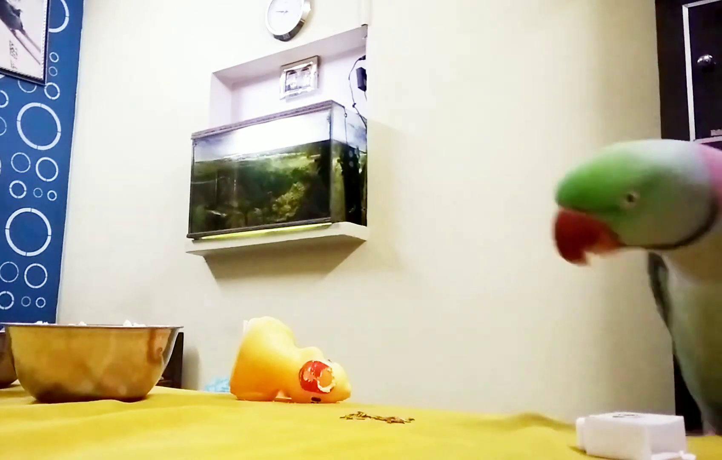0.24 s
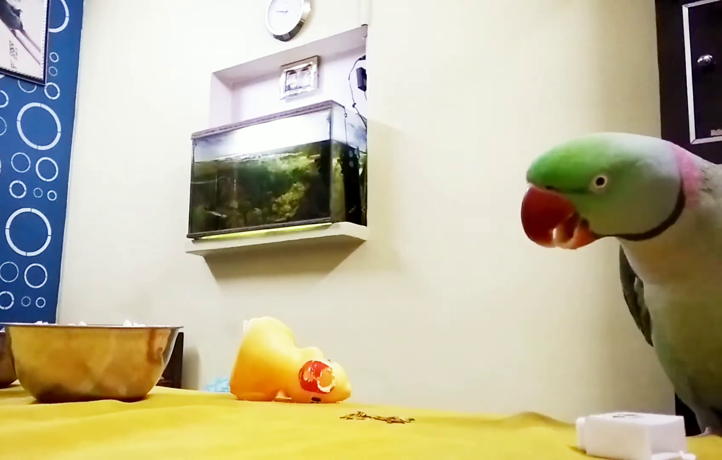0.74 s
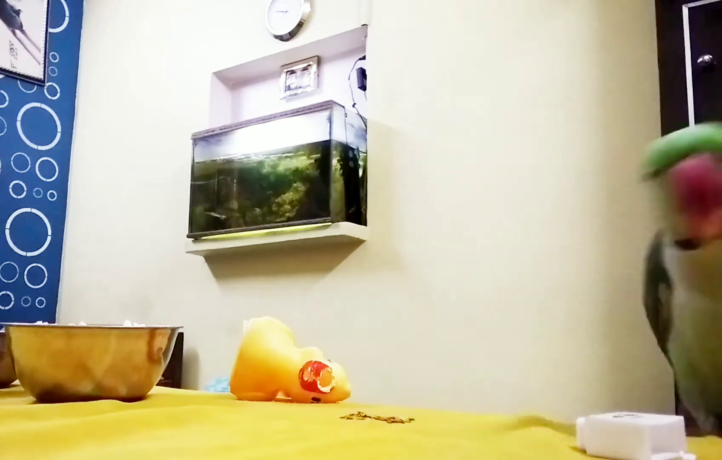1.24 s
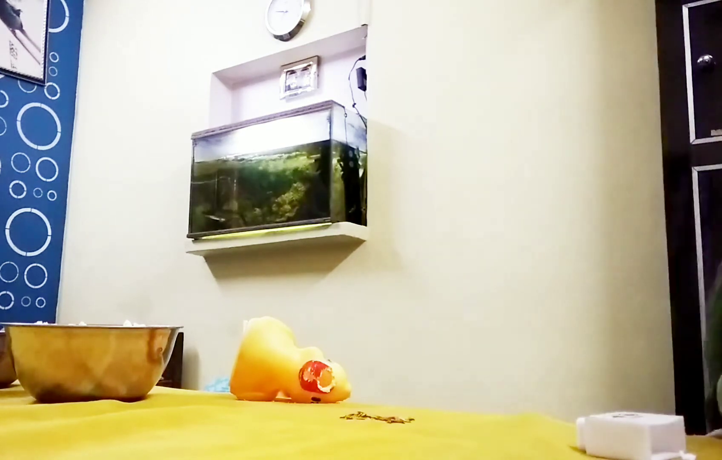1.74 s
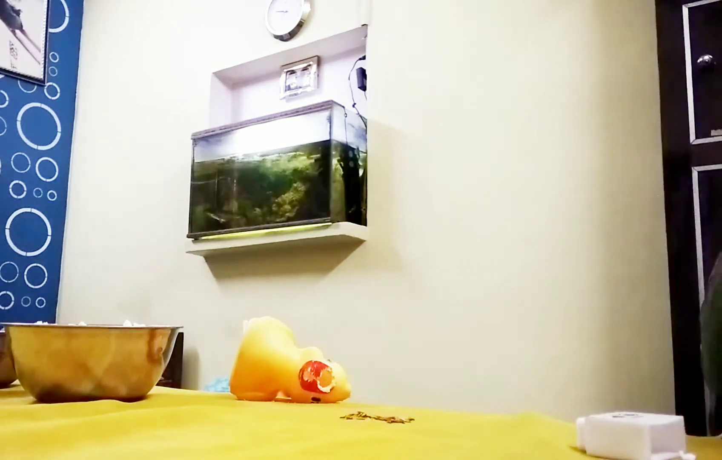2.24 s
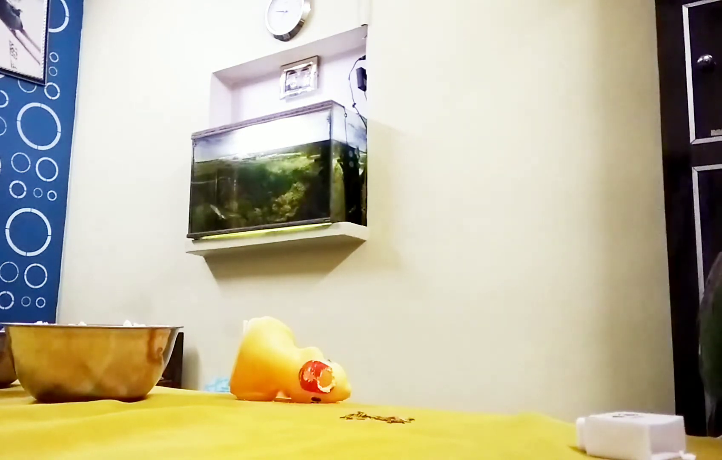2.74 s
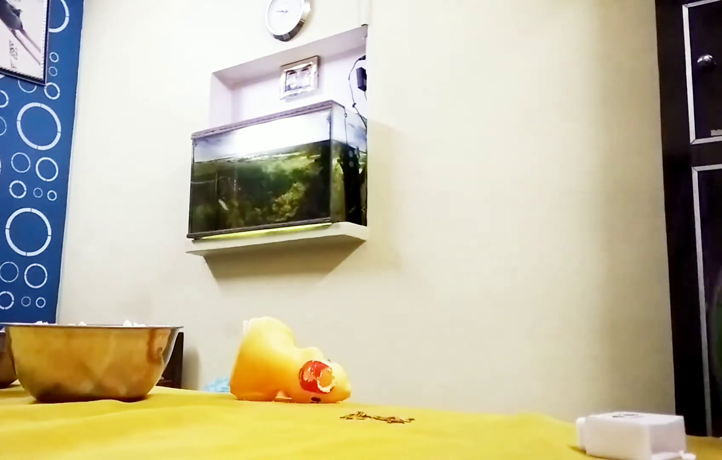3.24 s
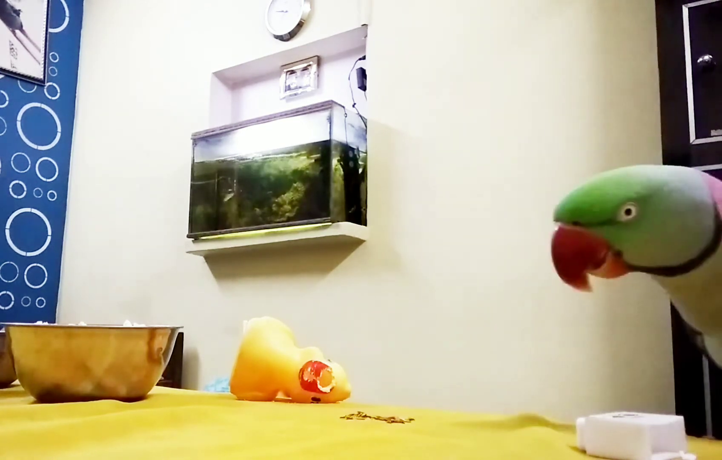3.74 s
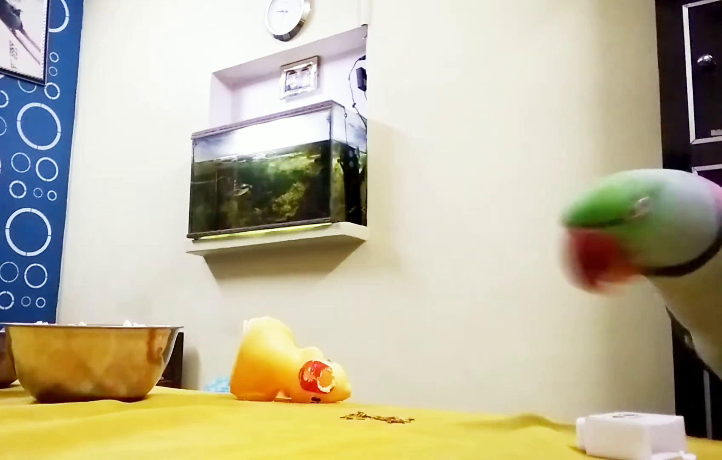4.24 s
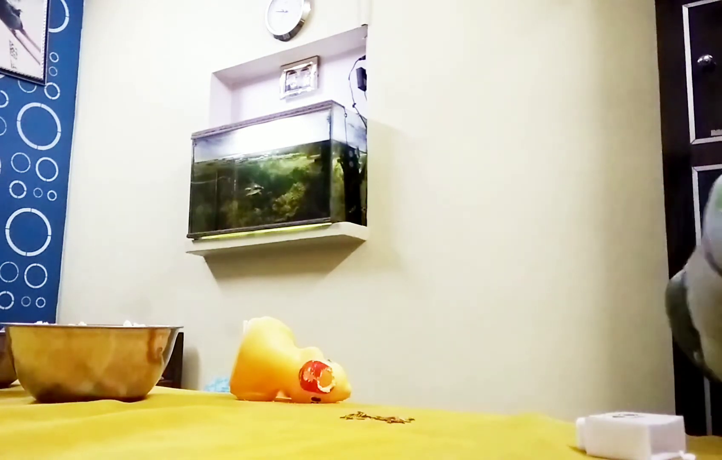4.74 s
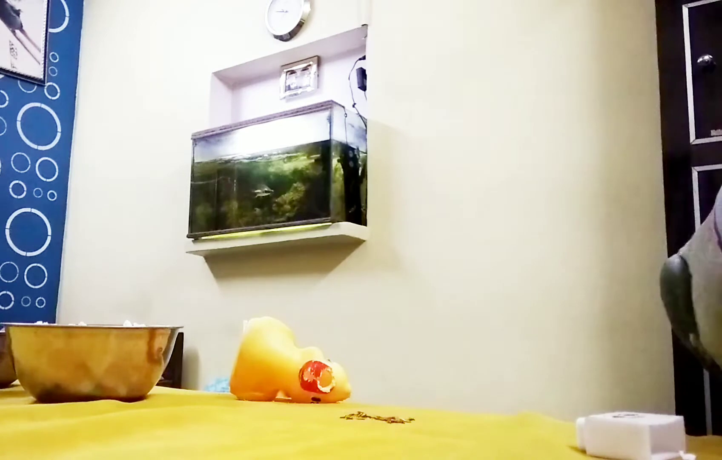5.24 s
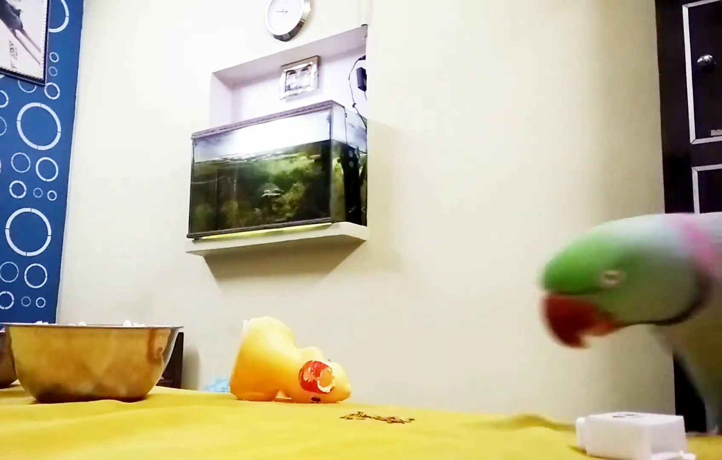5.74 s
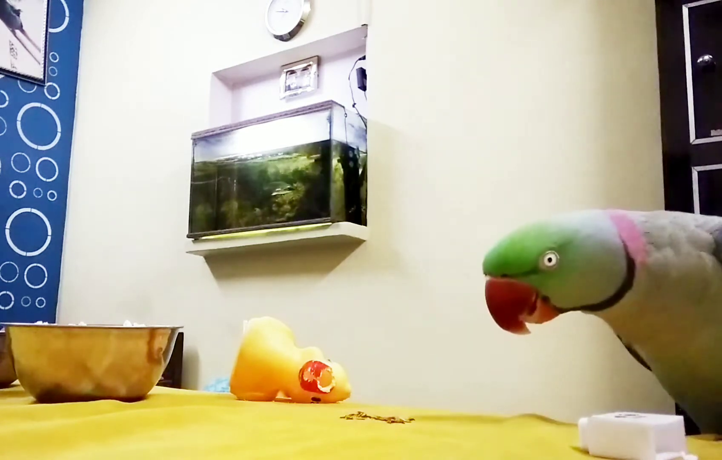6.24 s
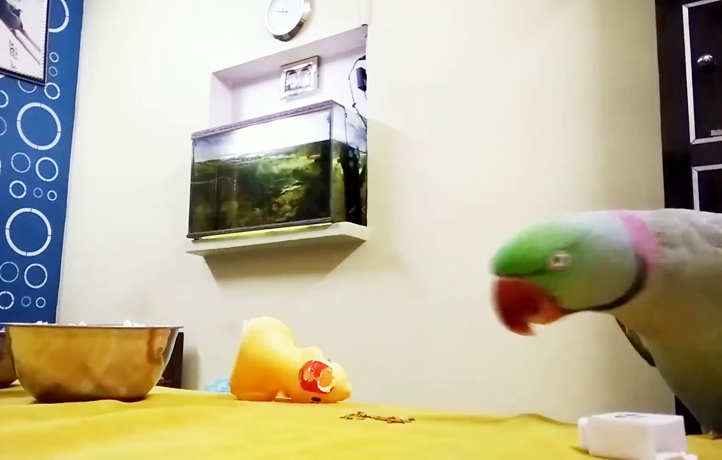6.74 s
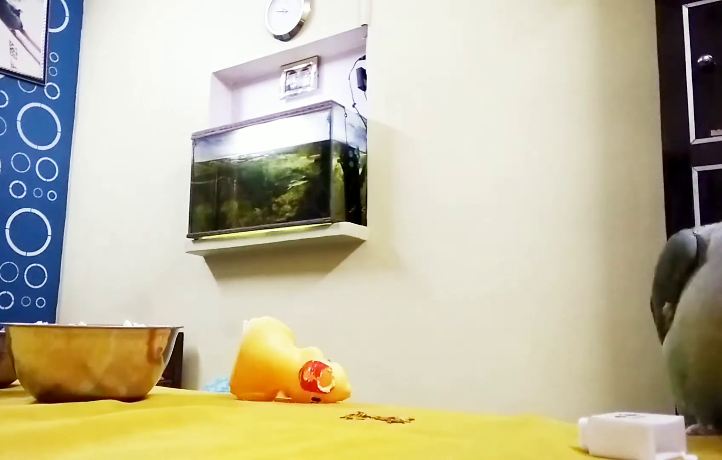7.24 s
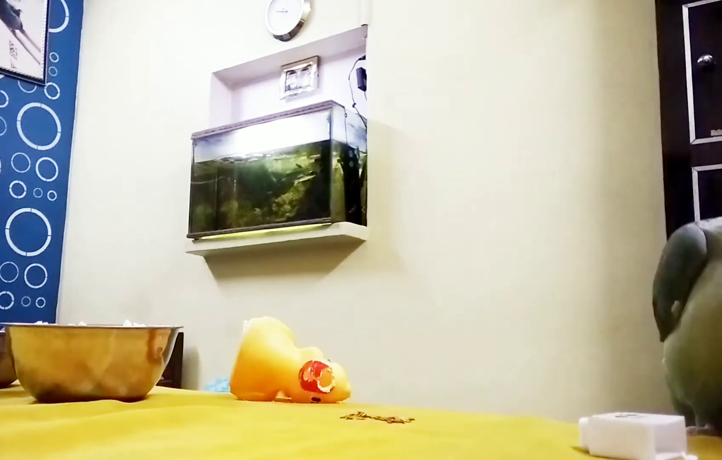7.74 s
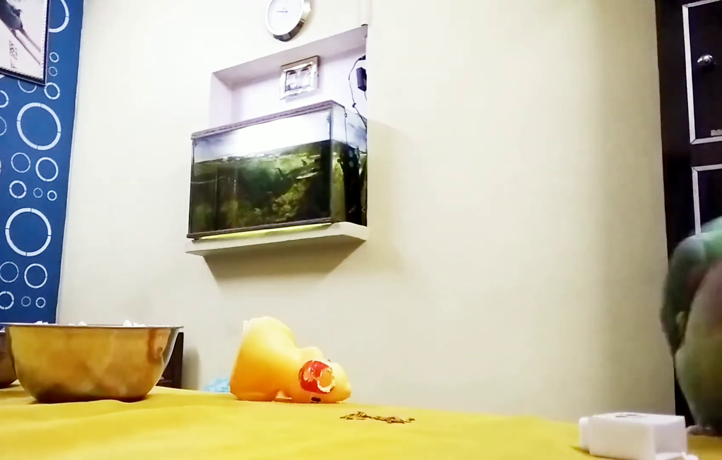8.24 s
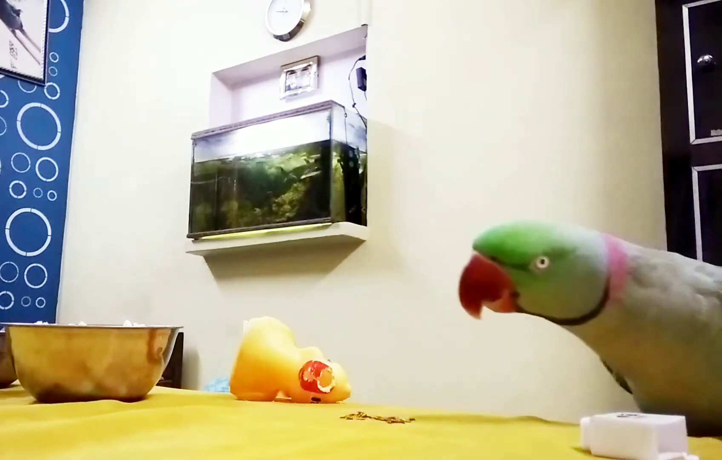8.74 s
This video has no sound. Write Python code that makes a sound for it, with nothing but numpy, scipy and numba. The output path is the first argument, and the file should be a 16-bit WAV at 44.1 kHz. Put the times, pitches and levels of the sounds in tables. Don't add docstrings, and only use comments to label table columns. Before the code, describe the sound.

Indoors, over faint hum and hiss, a pet parakeet chirps three times, each a quick bright rise snapping into a lower falling note, with a short dense room echo. Between the first two, a faint creaky voice slides slowly upward and cracks. Later come a small scratchy squawk and a strong pure whistle sweeping up. Dull footfalls and crisp beak or claw taps sound close to the stereo phone microphones.

```python
import sys
import numpy as np
from scipy import signal
from scipy.fft import rfft, irfft
from scipy.io import wavfile
from scipy.ndimage import uniform_filter1d, minimum_filter1d, map_coordinates
from numba import njit

SR = 44100
rng = np.random.default_rng(int(sys.argv[2]) if len(sys.argv) > 2 else 0)


def voltage_ratio(decibels):
    exponent = np.asarray(decibels, float) / 20
    return 10 ** exponent


def persist_wave(psi):
    counts = np.round(np.clip(psi, -1, 1) * 32767).astype(np.int16)
    wavfile.write(sys.argv[1], SR, np.atleast_2d(counts).T)


N = 396018
T = np.arange(N) / SR
F = np.fft.rfftfreq(N, 1 / SR) + 1
TOP_HZ = 14540


def on_log(table, hz):
    table_hz, values = np.array(table)[:, :2].T
    return np.interp(np.log(hz), np.log(table_hz), values)


def bell(freqs, hz, octaves):
    return np.exp(-.5 * (np.log2(freqs / hz) / octaves) ** 2)


def walk(rate, size):
    k = max(int(SR / rate), 1)
    held = np.repeat(rng.standard_normal(size // k + 1), k)
    return 1.65 * uniform_filter1d(uniform_filter1d(held, k), k)[:size]


def add(out, s, x, lead, pan_db):
    for port, late, db in ((0, 0.0011, pan_db / 2), (1, lead, -pan_db / 2)):
        heard = map_coordinates(x, [np.arange(len(x)) - late], order=3)
        i = int(s * SR)
        out[port, i:i + len(x)] += voltage_ratio(db) * heard[:N - i]


@njit
def follow(x, attack, release):
    e, out = 0., np.empty(len(x))
    for i in range(len(x)):
        e += (x[i] - e) * (attack if x[i] > e else release)
        out[i] = e
    return out


# f/Hz, level/dB per Hz
HUM_COLOUR = [(18, -59.5), (30, -42), (91, -3), (134, -8.5), (170, -2), (277, -11), (419, -6), (557, -8),
              (668, -5.5), (1980, -16.5), (4700, -26), (5000, -33.5), (9100, -26.5), (13100, -49),
              (14500, -44)]
# f/Hz, likeness/0-1
HUM_LIKENESS = [(60, 0), (130, 0.84), (290, 0.85), (640, 0.57), (1400, 0.85), (3090, 0), (6790, 0.13),
                (14900, 1)]
# f/Hz, left minus right level/dB
HUM_BALANCE = [(60, 12), (110, 9.5), (200, 16), (380, 9), (700, 0), (1290, 3.5), (2370, -1), (4380, 0.0),
               (8090, -5), (14900, 35.5)]


def hum():
    level_db, lead_samples = -45.5, 6.08
    a, b = rfft(rng.standard_normal((2, N)))
    like = np.clip(on_log(HUM_LIKENESS, F), 0, 1)
    delayed = a * np.exp(-2j * np.pi * F * lead_samples / SR)
    right = like * delayed + np.sqrt(1 - like ** 2) * b
    port_db = on_log(HUM_COLOUR, F) + np.array([[.5], [-.5]]) * on_log(HUM_BALANCE, F)
    pair = voltage_ratio(port_db) * np.array([a, right])
    out, swell, patches = 0, walk(1.776, size=N), walk(16, size=N)
    for hz in 32 * 2 ** np.arange(0, 9, .5):
        db = .5 * swell + 1.18 * walk(4.6, size=N) + 1.76 * patches * min(hz / 9000, 1.3)
        out = out + voltage_ratio(db) * irfft(pair * bell(F, hz, 0.28), N)
    return out * voltage_ratio(level_db) / out.mean(axis=0).std()


# f/Hz, level/dB, t60/s
ROOM_BANDS = [(600, -18, 0.46), (1200, -14, 0.36), (2440, -15.5, 0.36), (4200, -21.5, 0.39),
              (6570, -12, 0.32), (12300, -13.5, 0.33)]


def room(x):
    t = T[:SR // 2]
    mid, side = rfft(rng.standard_normal((2, len(t))))
    ports = np.array([mid + 0.86 * side, mid - 1.13 * side])
    freqs = np.fft.rfftfreq(len(t), 1 / SR) + 1
    tail = 0
    for hz, db, t60 in ROOM_BANDS:
        band = irfft(bell(freqs, hz, 0.28) * ports)
        tail = tail + voltage_ratio(db) * band * 1000 ** (-t / t60) / np.sqrt(t60 * SR / 14)
    tail *= np.clip((t - .004) / 0.0032, 0, 1)
    return signal.fftconvolve(x[None], tail, axes=1)[:, :N]


# t/s, peak level/dB, f/Hz, t60/s
FOOTFALLS = [(0.18, -36, 167, 0.091), (1.983, -29, 138, 0.08), (2.037, -32.5, 108, 0.11),
             (2.077, -32, 189, 0.073), (3.139, -58, 135, 0.072), (3.469, -31, 164, 0.05),
             (4.107, -33, 186, 0.056), (4.332, -36.5, 116, 0.11), (4.441, -28, 142, 0.077),
             (4.567, -37, 164, 0.11), (4.975, -34, 113, 0.13), (5.399, -35, 113, 0.12)]


def steps():
    out, t = np.zeros((2, N)), T[:SR // 8]
    for s, db, hz, t60 in FOOTFALLS:
        thump = np.sin(2 * np.pi * hz * t) * (1 - np.exp(-t / 0.0023)) * 1000 ** (-t / t60)
        add(out, s, voltage_ratio(db) * thump, 5., 12)
    return out


# t/s, peak level/dB, treble level/dB, left minus right level/dB
CLAW_TICKS = [
    (0.5027, -28.5, -12, -1),
    (1.7472, -20.5, -22, 13),
    (4.9234, -27.5, -19, 1),
    (6.004, -43, -22, -4),
    (6.166, -28, -26.5, 0),
    (7.5289, -28, -13.5, 0),
    (8.955, -28, -12, -2),
]
# f/Hz, level/dB, t60/s
CLAW_MODES = [(1420, -4, 0.0081), (4090, -4, 0.0054), (6250, -15, 0.0073), (8500, -4, 0.012),
              (12900, -23, 0.0029)]


def ticks():
    out, t = np.zeros((2, N)), T[:SR // 8]
    for s, db, treble_db, pan_db in CLAW_TICKS:
        ring = 0
        for hz, mode_db, t60 in CLAW_MODES:
            mode_hz = hz * (1 + 0.055 * rng.standard_normal())
            gain = voltage_ratio(mode_db + (hz > 5000) * treble_db)
            ring = ring + gain * np.sin(2 * np.pi * mode_hz * t) * 1000 ** (-t / t60)
        crack = voltage_ratio(-8 + treble_db / 3) * rng.standard_normal(len(t)) * 1000 ** (-t / 0.01)
        add(out, s, voltage_ratio(db) * (ring + crack), 3., pan_db)
    return out


# t/s, f/Hz, level/dB, length/s
BEAK_SQUEAKS = [
    (1.7675, 8700, -36, 0.00051),
    (6.476, 9000, -48, .003),
    (6.486, 9250, -44, 0.0021),
    (6.499, 9100, -49, 0.0055),
    (6.563, 8600, -47, 0.0077),
]


def squeaks():
    out, t = np.zeros((2, N)), T[:SR // 8]
    for s, hz, db, length in BEAK_SQUEAKS:
        swell = np.exp(-((t - .02) / length) ** 2)
        add(out, s - .02, voltage_ratio(db) * np.sin(2 * np.pi * hz * t) * swell, 0., 0)
    return out


# t/s, pitch drop/share, level drop/dB
VALVE_CLOSURES = [
    (8.016, 0.04, 13.5),
    (8.034, 0.11, 13),
    (8.054, 0.1213, 10),
    (8.073, 0.11, -1),
]


def note(rows, beak):
    air_db = -30.5
    blur_hz = 9600
    patchy_db = .8
    s, hz, first_db, over_db, rough = np.transpose(rows)
    t = np.arange(s[0] - .003, s[-1] + 0.0082, 1 / SR)
    size = len(t)
    first_db, over_db = np.interp(t, s, first_db), np.interp(t, s, over_db)
    rough = np.interp(t, s, np.clip(rough, 0, 1))

    pitch_drop, level_drop_db = 0, 0
    for at, drop, drop_db in VALVE_CLOSURES:
        shut = np.exp(-((t - at) / 0.0041) ** 2)
        pitch_drop = pitch_drop + shut * drop
        level_drop_db = level_drop_db + shut * drop_db
    pitch = np.interp(t, s, hz) * (1 - pitch_drop)
    pitch *= 1 + 0.066 * rough * walk(500, size) + .005 * walk(44.95, size)
    phase = 2 * np.pi * np.cumsum(pitch) / SR

    air_colour = voltage_ratio(on_log(beak, np.fft.rfftfreq(size, 1 / SR) + 1) / 2)
    air = irfft(rfft(rng.standard_normal(size)) * air_colour, size)
    sound = voltage_ratio(over_db + air_db) * air
    for k in range(1, int(TOP_HZ / hz.min())):
        db = first_db
        if k > 1:
            db = over_db + on_log(beak, k * pitch) + patchy_db * np.log2(k) * walk(22, size)
        blur = 1 / (1 + (blur_hz / (k * pitch)) ** 8)
        shake = 1 - blur + 0.89 * rough * k ** .6 * walk(900, size) + blur * walk(1100, size)
        sound = sound + voltage_ratio(db) * shake * (k * pitch < TOP_HZ) * np.sin(k * phase + .3 * k * k)
    fade_in = np.clip((t - t[0] - .0015) / 0.0021, 0, 1)
    fade_out = np.clip((t[-1] - .001 - t) / 0.0069, 0, 1)
    return np.sqrt(2) * sound * fade_in * fade_out * voltage_ratio(-level_drop_db)


def stretched(shape, s, length, first_hz, far_hz, db):
    return [(s + at * length, first_hz + way * (far_hz - first_hz), db + first_db, db + over_db, rough)
            for at, way, first_db, over_db, rough in shape]


# t/share of length, way from first to far pitch/0-1,
# fundamental level/dB, overtone level/dB, roughness/0-1
RISE_SHAPE = [(0, 0, -18.5, -6.5, 0.2), (.075, .01, -16, 1.5, .08), (.33, .11, -18, 0, .07),
              (0.542, .3, -12, -4.5, 0.16), (0.651, .72, -6, -11, .1), (0.771, 1, 3.5, -1, 0.07),
              (0.902, 0.93, -1, -1, 0.17), (1, 0.75, -19, -16.5, 0)]
FALL_SHAPE = [(0, .01, -2, -6, .1), (.19, .1, -6, 2, .1), (.44, .25, -9.5, 1, 0.17),
              (.64, 0.56, -13.5, -2.5, 0.18), (0.849, 0.63, -24.5, -10.5, 0.28),
              (0.999, 0.9, -19.5, -20.5, 0.16)]
# t/s, length/s, first f/Hz, far f/Hz, level/dB
CHIRP_RISES = [
    (0.779, 0.091, 1873, 2525, -12),
    (3.95, 0.096, 1915, 2606, -12.5),
    (5.235, .104, 1900, 2420, -7),
]
CHIRP_FALLS = [
    (0.866, .047, 1821, 760, -7),
    (4.035, 0.053, 1849, 766, -10),
    (5.336, 0.05, 1794, 716, -11),
]
# left port lead/samples, left minus right level/dB,
# room send of the rise/dB, room send of the fall/dB, treble level/dB per octave
CHIRP_HEADS = [
    (3, -.6, 1.5, 5, -3),
    (3.5, 3.5, 0, 6, -2.4),
    (8.1, 2.2, -1.5, 6.5, 1.5),
]
# t/s, f/Hz, fundamental level/dB, overtone level/dB, roughness/0-1
CREAK_CALL = [(2.25, 327, -54, -54, 0.26), (2.3, 352.3, -41, -44.5, 0.18),
              (2.38, 396.4, -42.5, -41.5, 0.15), (2.45, 398, -39.5, -39, 0.02), (2.6, 472, -35, -37, 0.04),
              (2.7, 507.6, -37, -35, .05), (2.8, 588, -36, -33.5, 0.08), (2.87, 623.5, -39, -38, 0.03),
              (2.95, 733, -35.5, -35, .06)]
CREAK_END = [(3.0, 754.5, -32.5, -26.5, .06), (3.06, 851, -31, -24, 0.044), (3.1, 907, -26, -9, 0.13),
             (3.12, 975, -20, -9.5, 0.14), (3.132, 1108, -23.5, -8, 0.058), (3.141, 1390, -17.5, -11, 0.11),
             (3.145, 916, -31, -24, 0.3), (3.156, 651, -33, -29, 0.19), (3.162, 637, -47, -53, .4)]
SQUAWK_CALL = [(6.571, 1022, -33, -33, .1), (6.576, 960, -28, -20.5, 0.089),
               (6.584, 1109, -27, -15.5, 0.19), (6.592, 1043, -25, -25, 0.72),
               (6.6, 820, -29.5, -15.5, 0.46), (6.608, 736, -29, -24, 0.43), (6.617, 587, -29.5, -34, 0.22)]
WHISTLE_CALL = [(7.88, 1375, -44, -68, .05), (7.915, 1418, -34.5, -78, 0.043),
                (7.93, 1443, -20, -35.5, .05), (7.96, 1603, -8.5, -30.5, 0.046),
                (8.008, 1977, -4.5, -27, 0.043), (8.025, 2297, 2, -10, .05),
                (8.055, 2423, -3.5, -10, 0.044), (8.081, 2478, -10, -28, 0.051),
                (8.089, 2240, -19, -42, .08)]
# left port lead/samples, left minus right level/dB,
# room send/dB, treble level/dB per octave
CREAK_AIM = (9.17, 4.6, 5.4, .1)
SQUAWK_AIM = (1.5, .4, 3.8, 1.4)
WHISTLE_AIM = (8, .6, 1.5, -1)
# f/Hz, level/dB
BEAK_OPEN = [(1500, 2.5), (2700, -1.2), (3800, -1.1), (4400, 0), (5400, -19), (7600, -12.5), (10300, -26.5),
             (14000, -38)]
BEAK_SHUT = [(1400, 0.6), (2300, -8), (4000, -8), (5000, -20), (6700, -22), (8500, -22.5), (11800, -35.5),
             (14300, -38)]
BEAK_HALF = [(1600, 11), (3200, 5), (4700, -3), (6500, -0.5), (7400, 0.5), (9500, -4), (10800, -8.5),
             (14000, -18)]


def bird():
    calls = []
    for send, shape, chirps in ((2, RISE_SHAPE, CHIRP_RISES), (3, FALL_SHAPE, CHIRP_FALLS)):
        for chirp, head in zip(chirps, CHIRP_HEADS):
            calls.append((stretched(shape, *chirp), BEAK_OPEN, (head[0], head[1], head[send], head[4])))
    calls.append(([*CREAK_CALL, *CREAK_END], BEAK_SHUT, CREAK_AIM))
    calls.append((SQUAWK_CALL, BEAK_SHUT, SQUAWK_AIM))
    calls.append((WHISTLE_CALL, BEAK_HALF, WHISTLE_AIM))
    near, far = np.zeros((2, N)), np.zeros((2, N))
    for rows, beak, (lead, pan_db, send_db, treble_db) in calls:
        aimed = [(hz, db + treble_db * max(np.log2(hz / 4000), 0)) for hz, db in beak]
        x = note(rows, aimed)
        start = rows[0][0] - .003
        add(near, start, x, lead, pan_db)
        add(far, start, x * voltage_ratio(send_db), 0., 0)
    return near, far[0]


def scene():
    near, far = bird()
    small = steps() + ticks() + squeaks()
    loud = follow(np.abs(near).max(axis=0), 1 / (0.025 * SR), 1 / (.08 * SR))
    duck = 1 / (1 + (loud / voltage_ratio(-1.5)) ** 2.6)
    far = map_coordinates(far, [np.arange(N) + 3.54 * walk(90, size=N)], order=3)
    heard = near + small + room(far + 0.76 * small[0]) + duck * hum()
    notch_hz, notch_octaves, notch_db = 10650, 0.048, -33
    band = irfft(rfft(heard) * bell(F, notch_hz, notch_octaves) ** .5, N)
    return heard - band * loud ** 2 / (loud ** 2 + voltage_ratio(notch_db) ** 2)


def roll_off(x):
    return signal.sosfilt(signal.butter(12, 15530, fs=SR, output="sos"), x)


def record(dry):
    limit_db, joint_hz, joint_side_db = -3, 6230, -4.5
    peak = -minimum_filter1d(-np.abs(dry).max(axis=0), size=129)
    held = uniform_filter1d(follow(peak, 0.88, 1 / (0.013 * SR)), size=129)
    limited = dry / (1 + (held / voltage_ratio(limit_db)) ** 6) ** (1 / 7)
    left, right = rfft(limited)
    joint = 1 / (1 + (joint_hz / F) ** 20)
    right = right + joint * (1 - voltage_ratio(joint_side_db)) * (left * voltage_ratio(3.5) - right)
    wet = irfft(np.array([left, right]) / (1 + (F / TOP_HZ) ** 60), N)
    return roll_off(wet)


dry = scene()
out = record(dry)
persist_wave(out)
```